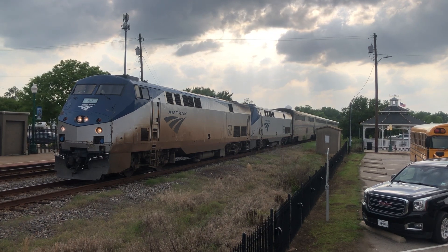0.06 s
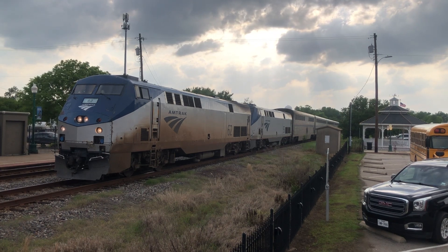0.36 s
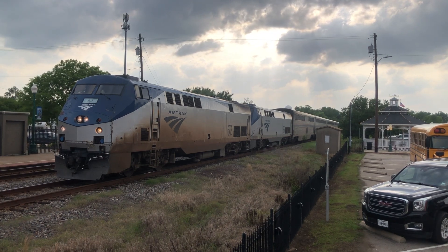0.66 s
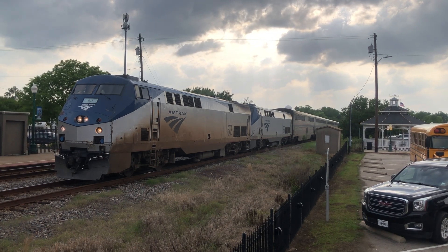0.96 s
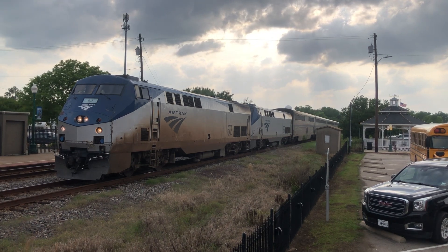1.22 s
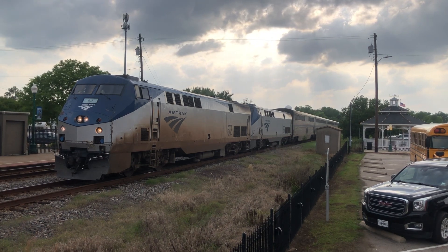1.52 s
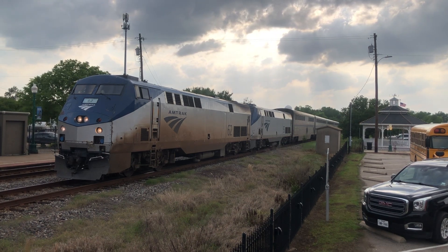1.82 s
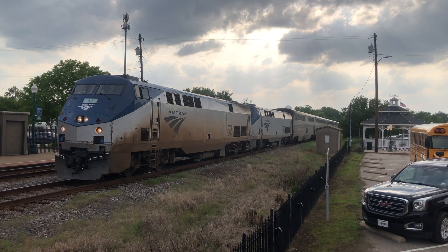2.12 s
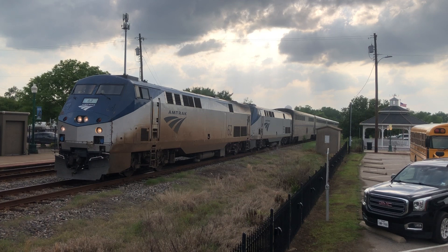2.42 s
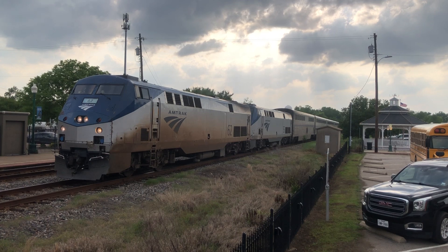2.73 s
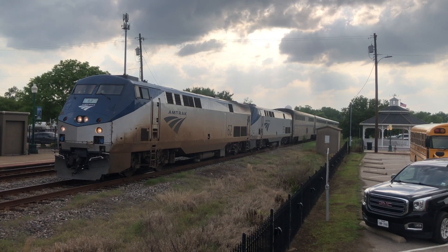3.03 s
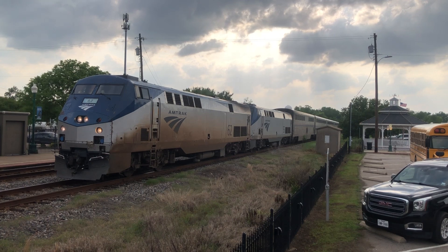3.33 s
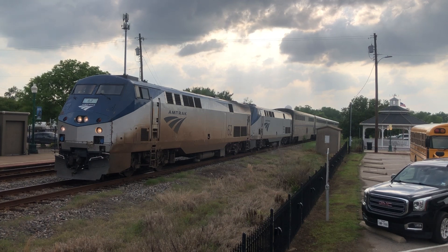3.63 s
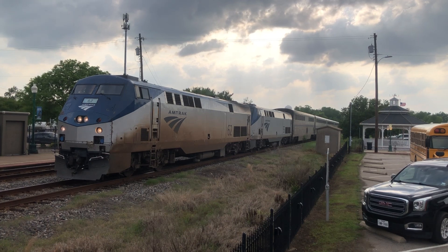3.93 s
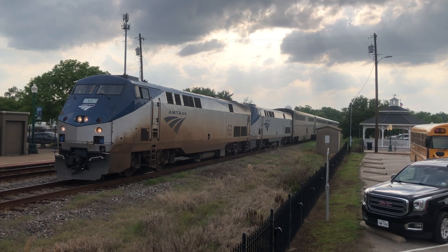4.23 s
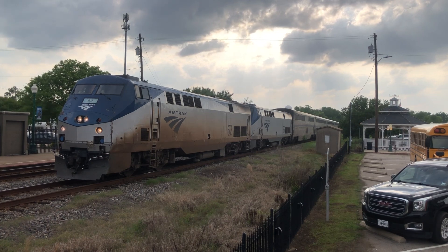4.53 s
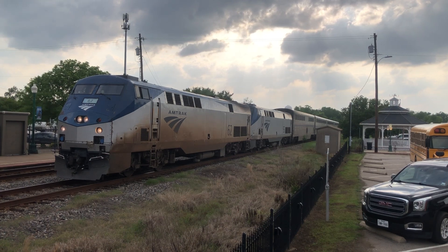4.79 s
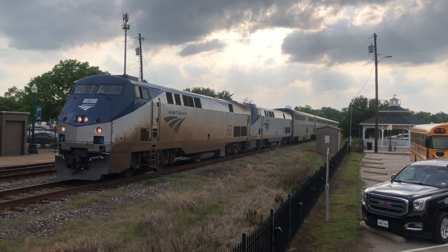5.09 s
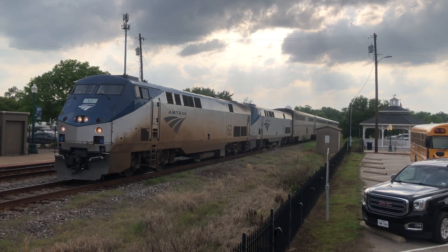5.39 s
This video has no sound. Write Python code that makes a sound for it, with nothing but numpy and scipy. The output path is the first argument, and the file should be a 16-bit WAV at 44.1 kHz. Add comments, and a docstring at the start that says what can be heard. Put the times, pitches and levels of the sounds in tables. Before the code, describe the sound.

Two diesel locomotives idle with a low throbbing drone, and an air brake lets out one short, sharp hiss.

```python
"""Two coupled diesel locomotives idle at a station, one engine turning fast and one slow.
Their exhaust notes beat against each other in a throbbing drone, over clattering fuel injectors,
fans, hums, a thin whine and seeping air. Once, an air brake valve spits and blows off its air,
and that hiss bounces back from the train and the buildings."""
import sys
import numpy as np
from scipy import signal
from scipy.fft import rfft, irfft
from scipy.io import wavfile

SR = 44100
rng = np.random.default_rng(int(sys.argv[2]) if len(sys.argv) > 2 else 0)


def generate_wav(signal):
    """Clip the signal to [-1, 1] and save it as 16-bit WAV at the path in sys.argv[1]."""
    frames = np.transpose(np.atleast_2d(signal))
    scaled = np.clip(frames, -1, 1) * 32767
    pcm = np.round(scaled).astype(np.int16)
    wavfile.write(sys.argv[1], SR, pcm)


N = 244913
T, HZ = np.arange(N) / SR, np.fft.rfftfreq(N, 1 / SR)


def amp(db):
    """Turns decibels into a gain to multiply by."""
    return 10 ** (np.asarray(db) / 20)


def unit(x):
    """Scales a signal to an average strength (rms) of 1."""
    return x / np.sqrt(np.mean(x ** 2) + 1e-20)


def noise():
    """White noise: an even hiss."""
    return rng.standard_normal(N)


def colour(x, points, peaks=()):
    """Shapes bass and treble with a curve plus ringing peaks; the result has strength 1."""
    hz, db = np.transpose(points)
    shape = np.interp(np.log(HZ + 1), np.log(hz), db)
    for centre, width, lift in peaks:
        shape = shape + lift / (1 + (2 * (HZ - centre) / width) ** 2)
    return unit(irfft(rfft(x) * amp(shape), N))


def drift(rate_hz):
    """A random wobble of strength 1, no faster than about rate_hz."""
    spectrum = rfft(rng.standard_normal(4096)) / (1 + (np.arange(2049) / T[-1] / rate_hz) ** 4)
    return np.interp(T, np.linspace(0, T[-1], 4096), unit(irfft(spectrum)))


def tone(hz, width_hz, unsteady):
    """A single wavering note of strength 1."""
    waver = 1 + unsteady * (drift(width_hz) + 1j * drift(width_hz))
    return unit((waver * np.exp(2j * np.pi * (hz * T + rng.random()))).real)


def burst(start_s, rise_s, hold_s, fall_db_per_s):
    """A gain that rises, holds, then dies away."""
    age = np.maximum(T - start_s, 0)
    return np.minimum(age / rise_s, 1) ** .75 * amp(-fall_db_per_s * np.maximum(age - rise_s - hold_s, 0))


def swell(top_s, length_s):
    """A smooth hump of height 1, length_s wide halfway up."""
    return 2 ** -((2 * (T - top_s) / length_s) ** 2)


# The fast engine's speed, which its governor lets sag a little: (time [s], speed [cycles/s])
FAST_SPEED = [(0, 6.0), (2.6, 6.0), (3.2, 5.994)]

def engine_cycles(slow_cycle_hz=3.862, fast_offset_s=.108, slow_offset_s=.185):
    """Counts each engine's cycles; in one cycle every cylinder fires once."""
    fast_hz = np.interp(T, *np.transpose(FAST_SPEED))
    fast = np.cumsum(fast_hz) / SR - fast_offset_s * fast_hz[0]
    slow = slow_cycle_hz * (T - slow_offset_s)
    return fast, slow


# The tones in each engine's exhaust: (pitch [multiple of the cycle rate], level [dB])
FAST_NOTES = [(5, -63), (9, -50), (10, -50), (11, -25.5), (12, -45.5), (13, -36.5), (14, -67), (18, -45.5),
              (28, -54.5), (46, -51.5)]
SLOW_NOTES = [(13, -51.5), (14, -44.5), (15, -35.5), (16, -37), (17, -51), (18, -45), (19, -41), (21, -51),
              (56, -55)]

def exhaust_drone(cycles, notes, uneven):
    """Unequal cylinders repeat once a cycle, so the exhaust sounds multiples of that rate."""
    return sum(amp(db) * np.sqrt(2) * (1 + uneven * drift(4.5)) * np.cos(2 * np.pi * round(k) * cycles)
               for k, db in notes)


def firings(cycles, fade, spread_db, cylinders=16):
    """One dying puff per firing, each a bit different; fade is a share of the gap between puffs."""
    stroke = (cycles + 1) * cylinders
    index = stroke.astype(int)
    per_cylinder = rng.standard_normal(cylinders)[index % cylinders]
    per_firing = rng.standard_normal(1024)[index % 1024]
    return unit(amp(spread_db * (per_cylinder + per_firing)) * np.exp(-(stroke % 1) / fade))


# Swirling exhaust gas: (frequency [Hz], relative level [dB])
GAS_COLOUR = [(18, -42), (30, -30), (39, -24), (53, 1), (66, 4.5), (80, 2), (94, -8), (125, -13.5),
              (160, -6.5), (200, -10.5), (245, -15), (295, -14), (345, -19), (700, -38.5), (3000, -100)]

def exhaust_rumble(cycles, level_db=-34):
    """Gas rumbles out of the stacks, puffing as the cylinders fire."""
    puffs = 1.8 + firings(cycles, fade=.81, spread_db=1)
    return amp(level_db) * colour(noise() * puffs, GAS_COLOUR)


def injector_clatter(fast, slow):
    """The fuel injectors tick at every firing; the engine hood keeps the sharpest treble in."""
    ticks = noise() * firings(fast, fade=.5, spread_db=2.5)
    ticks += noise() * firings(slow, fade=.45, spread_db=.5)
    return signal.sosfilt(signal.butter(2, 4500, fs=SR, output="sos"), ticks)


def near_echoes(x, share, count=8):
    """Quick bounces off track stones and car sides boost some pitches and weaken others."""
    delays_s = rng.uniform(.002, .03, count)
    bounces = sum(np.roll(x, int(s * SR)) * (-1) ** k for k, s in enumerate(delays_s))
    return x + share * bounces / np.sqrt(count)


# Fans and engine block heard through the hood: (frequency [Hz], relative level [dB])
HOOD_COLOUR = [(150, -29.5), (350, -5), (490, 1), (740, -3.5), (880, -2.5), (1250, -5.5), (1700, -6.5),
               (2230, -13.5), (3900, -14.5), (4900, -18), (6400, -26), (8000, -29.5), (15500, -39.5)]
# Ringing panels and ducts: (frequency [Hz], width [Hz], boost [dB])
HOOD_PEAKS = [(685, 43, 3), (750, 43, -0.5), (816, 9.3, 4), (1640, 36, -0.5), (2390, 43, 3.5),
              (3430, 220, 1.5), (5414, 320, 4.5), (7100, 340, 2)]

def fans_and_hood(clatter, level_db=-43.1):
    """The steady rush of the fans comes through the hood together with the clatter."""
    machinery = near_echoes(noise() + amp(-11) * clatter, share=.28)
    return amp(level_db) * colour(machinery, HOOD_COLOUR, HOOD_PEAKS)


# Hums of the smaller machines: (pitch [Hz], width [Hz], level [dB])
MACHINE_HUMS = [(153.4, 2.5, -50), (233.7, 2.3, -55.5), (263.7, 4, -57), (361.2, 4.3, -60)]

def hums():
    """Smaller machines on board hum with wavering notes."""
    return sum(amp(db) * tone(hz, width, unsteady=.7) for hz, width, db in MACHINE_HUMS)


# Moments when the blower grows louder: (peak time [s], length [s], boost [dB])
BLOWER_SWELLS = [(1.0, .45, 3), (4.8, .7, 3.5)]

def blower(blade_hz=429.4, level_db=-54.2):
    """A cooling blower's blades make a note and a weaker one an octave up."""
    blades = tone(blade_hz, 5, unsteady=.28) + amp(-11) * tone(2 * blade_hz, 8, unsteady=.9)
    boost_db = sum(db * swell(s, length) for s, length, db in BLOWER_SWELLS)
    return amp(level_db + boost_db) * blades


def whine(pitch_hz=1269, faint_db=-61.5, surge_db=-57):
    """A thin whine, faint at first, comes up quickly and then eases off."""
    surge = burst(start_s=3.37, rise_s=.12, hold_s=.85, fall_db_per_s=7)
    return (amp(faint_db) + amp(surge_db) * surge) * tone(pitch_hz, 14, unsteady=.62)


# The hiss of seeping air: (frequency [Hz], relative level [dB])
SEEP_COLOUR = [(1000, -19.5), (5500, 17.5), (7500, 9.5), (9000, -5.5), (11200, -14.5), (12300, -9.5),
               (14000, -7.5), (15700, -7.5)]
# Its sizzle: (frequency [Hz], width [Hz], boost [dB])
SEEP_SIZZLE = [(5300, 320, 9)]
# Its swells: (peak time [s], length [s], level [dB])
SEEP_SWELLS = [(.5, .45, -63), (1.05, .45, -65), (3.02, .18, -60), (4.02, .7, -62.5), (5.35, .25, -69)]

def seeping_air(steady_db=-74):
    """Air leaks from the train all the time, and now and then the hiss swells."""
    leak = amp(steady_db) + sum(amp(db) * swell(s, length) for s, length, db in SEEP_SWELLS)
    return leak * colour(noise(), SEEP_COLOUR, SEEP_SIZZLE)


# The first spit of air: (frequency [Hz], relative level [dB])
SPIT_COLOUR = [(200, -5), (700, 1.5), (1500, -1.5), (2500, -4), (5000, -3), (8500, -2.5), (10500, -8),
               (12500, -7), (15700, 3.5)]
# Pitches the pipe boosts in it: (frequency [Hz], width [Hz], boost [dB])
SPIT_PEAKS = [(3430, 120, 13), (4900, 380, 9.5), (7800, 170, 8.1), (8770, 170, 8.7), (12000, 370, 4),
              (14400, 150, 4.1)]
# The pipe's ringing: (pitch [Hz], time to fade by 60 dB [s], level [dB])
PIPE_RING = [(3550, 0.08, -33.5), (4840, 0.049, -47)]

def valve_spit(start_s=1.8705, level_db=-22.5):
    """The brake valve cracks open with a short spit that leaves its pipe ringing."""
    flow = amp(level_db) * burst(start_s, rise_s=.009, hold_s=.006, fall_db_per_s=800)
    spit = flow * colour(noise(), SPIT_COLOUR, SPIT_PEAKS)
    age = np.maximum(T - start_s, 0)
    fading_s = np.maximum(age - .013, 0)
    ring = sum(amp(db - 60 * fading_s / fade_s) * tone(hz, 70, unsteady=.54)
               for hz, fade_s, db in PIPE_RING)
    return spit + ring * (1 - np.exp(-age / .0073))


# The main jet of air: (frequency [Hz], relative level [dB])
BLAST_COLOUR = [(300, -15), (1200, -6), (2300, -9.5), (3400, -1.5), (5000, 1), (7700, 0.5), (10300, -1),
                (12500, 2.5), (13800, 2.5), (15700, 2)]
# Pitches the pipe boosts in it: (frequency [Hz], width [Hz], boost [dB])
BLAST_PEAKS = [(4010, 55, 2.8), (6270, 60, 7.7), (7470, 60, 6), (11600, 140, 3), (12600, 250, 3)]

def valve_blast(start_s=1.897, level_db=-20.8, dull_db=-5.5, flare_db=7.5):
    """The valve opens fully and dumps its air; the jet flares bright, then dulls as pressure drops."""
    jet = colour(noise(), BLAST_COLOUR, BLAST_PEAKS)
    body = signal.sosfiltfilt(signal.butter(3, 10000, fs=SR, output="sos"), jet)
    treble = jet - body
    brightness = amp(dull_db + flare_db * swell(start_s + .04, length_s=.04))
    flow = amp(level_db) * burst(start_s, rise_s=.049, hold_s=.024, fall_db_per_s=245)
    return flow * (body + brightness * treble)


def station_echoes(x, scatter_db, echo_db, echo_s):
    """Sound scatters off the train and ground, and a soft late echo returns from the buildings."""
    hz, t, hiss = signal.stft(rng.standard_normal(SR), SR, nperseg=256)
    fade_s = np.interp(hz, [1000, 5000, 9000, 15000], [.7, .63, .6, .31])[:, None]  # treble dies first
    scatter = amp(-60 * t / fade_s)
    late_echo = amp(echo_db - hz[:, None] / 3000) * np.exp(-((t - echo_s) / .025) ** 2)
    build_up = 1 - np.exp(-t / .011)
    tail = signal.istft(hiss * (scatter + late_echo) * build_up, SR, nperseg=256)[1]
    return x + amp(scatter_db) * signal.fftconvolve(x, tail / np.linalg.norm(tail))[:N]


def scene():
    """The idling train and its one blow-off, in a single channel."""
    fast, slow = engine_cycles()
    train = exhaust_drone(fast, FAST_NOTES, uneven=.05) + exhaust_drone(slow, SLOW_NOTES, uneven=.1)
    train += exhaust_rumble(fast)
    train += fans_and_hood(injector_clatter(fast, slow))
    train += hums() + blower() + whine() + seeping_air()
    valve = station_echoes(valve_spit() + valve_blast(), scatter_db=-11, echo_db=-26, echo_s=.26)
    return (train + valve)[None]


def record(dry):
    """Cuts away the very highest treble, above 15850 Hz."""
    low_pass = signal.firwin(1023, 15850, window=("kaiser", 9), fs=SR)
    return signal.oaconvolve(dry, low_pass[None], "same")


dry = scene()
out = record(dry)
generate_wav(out)
```